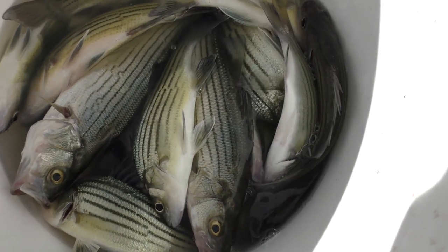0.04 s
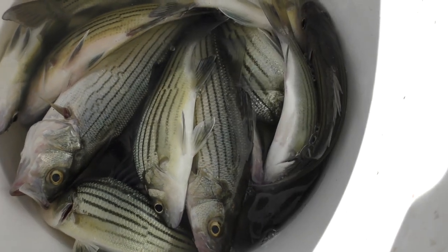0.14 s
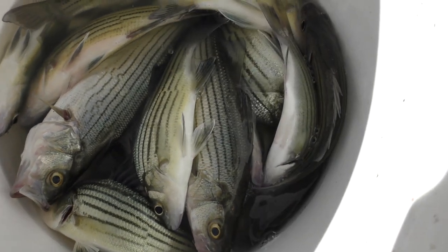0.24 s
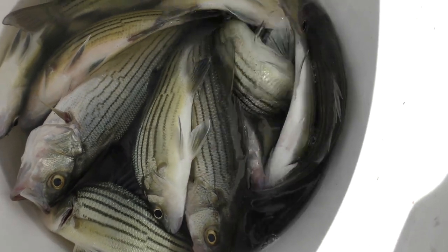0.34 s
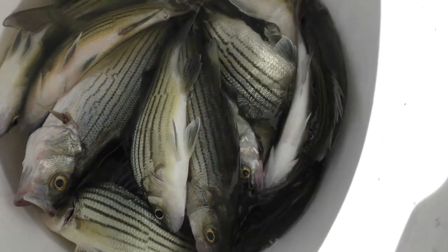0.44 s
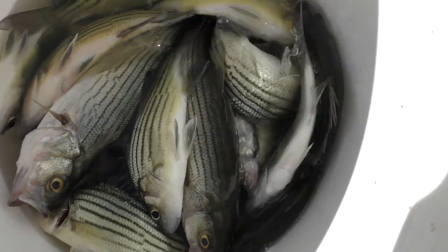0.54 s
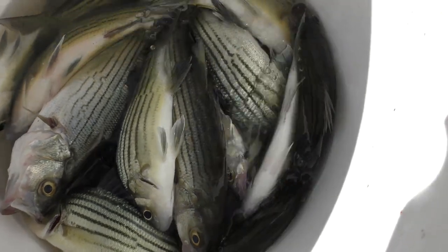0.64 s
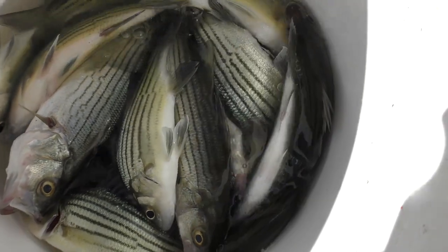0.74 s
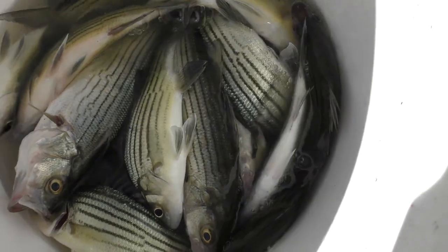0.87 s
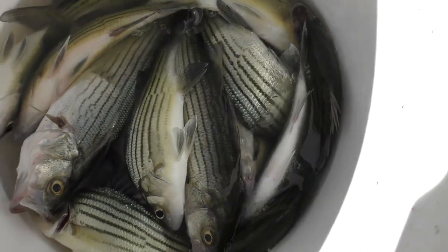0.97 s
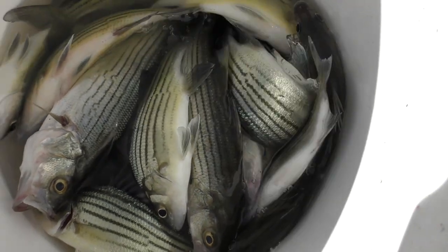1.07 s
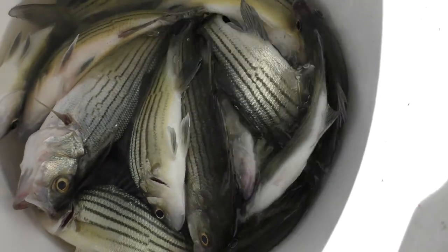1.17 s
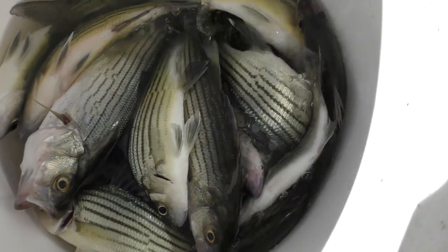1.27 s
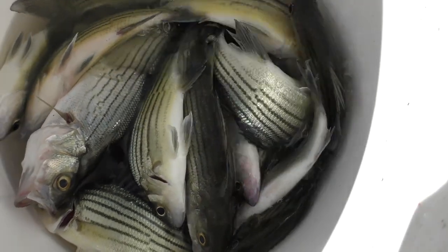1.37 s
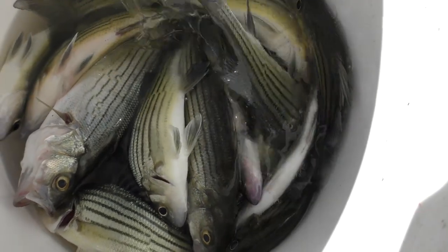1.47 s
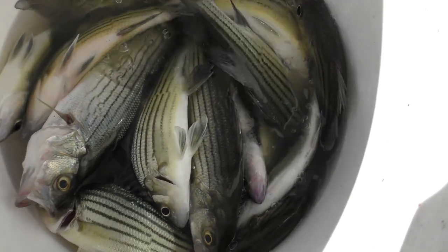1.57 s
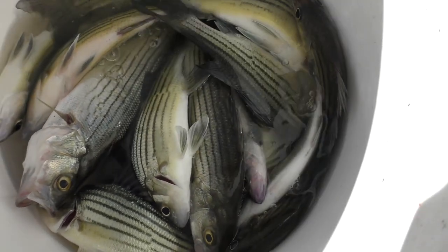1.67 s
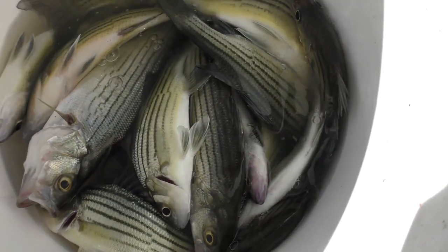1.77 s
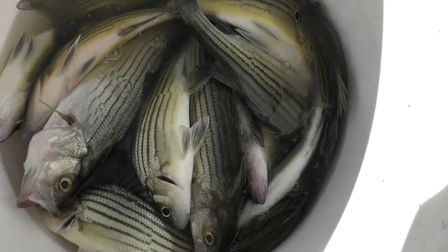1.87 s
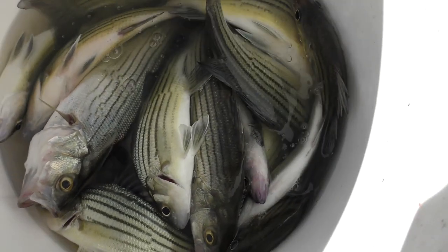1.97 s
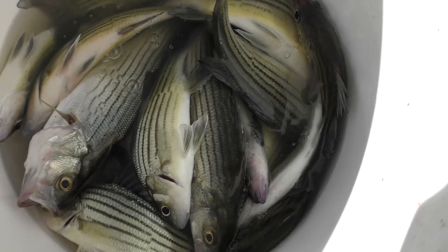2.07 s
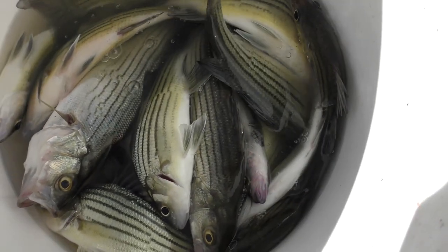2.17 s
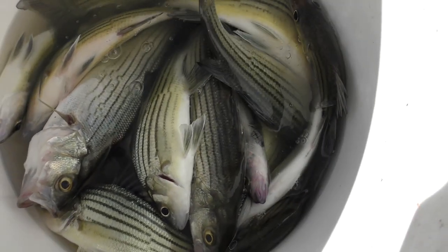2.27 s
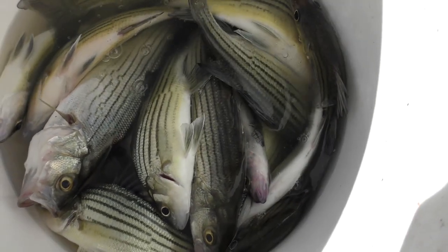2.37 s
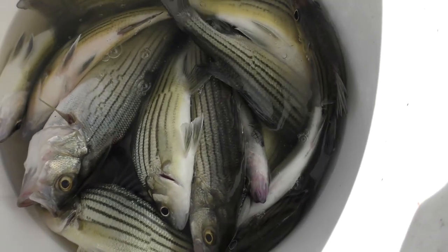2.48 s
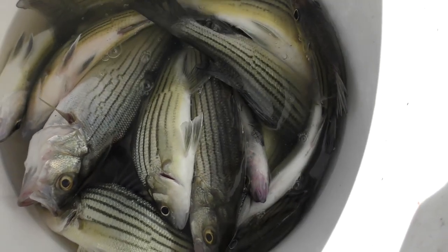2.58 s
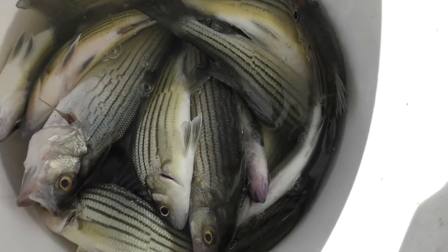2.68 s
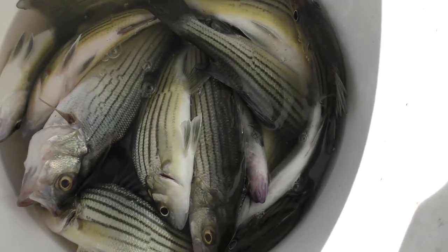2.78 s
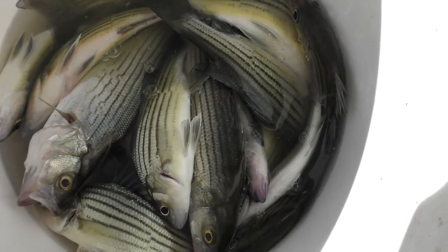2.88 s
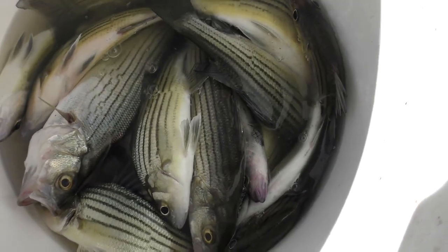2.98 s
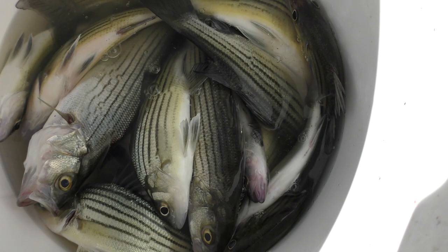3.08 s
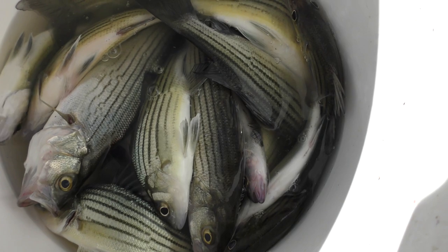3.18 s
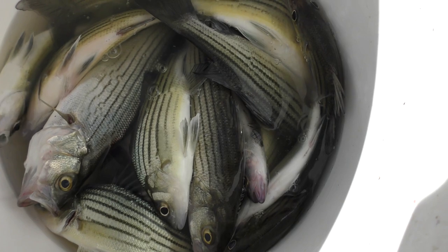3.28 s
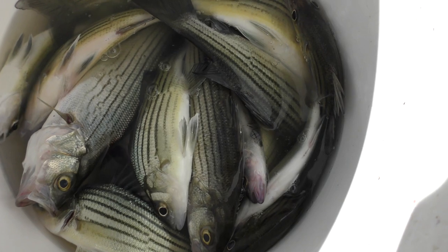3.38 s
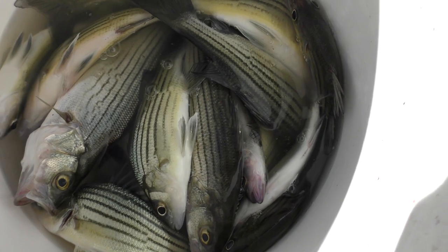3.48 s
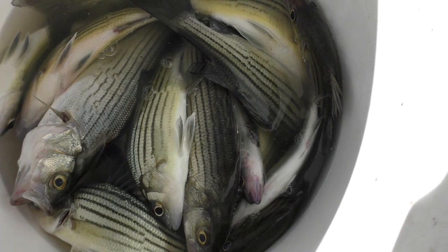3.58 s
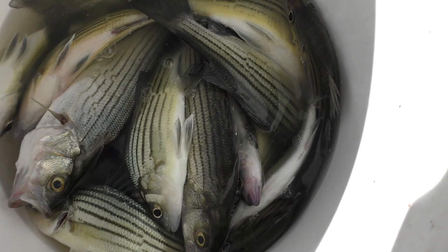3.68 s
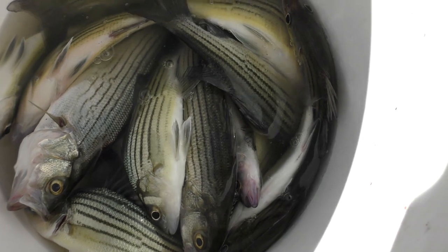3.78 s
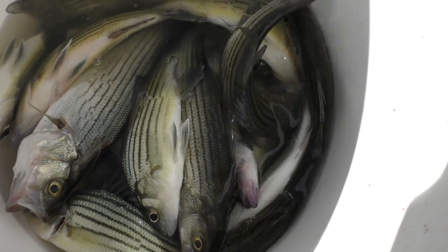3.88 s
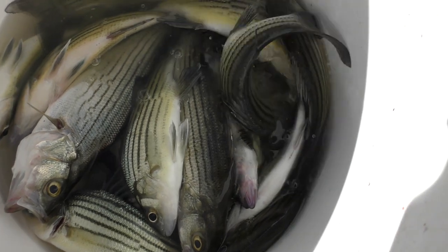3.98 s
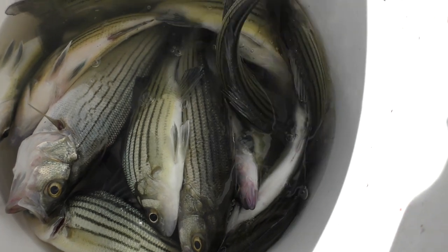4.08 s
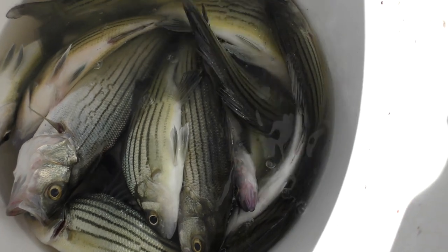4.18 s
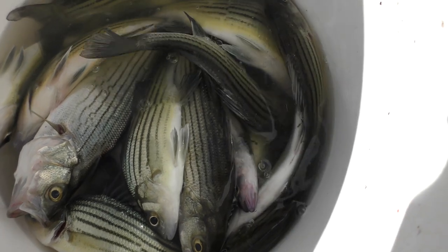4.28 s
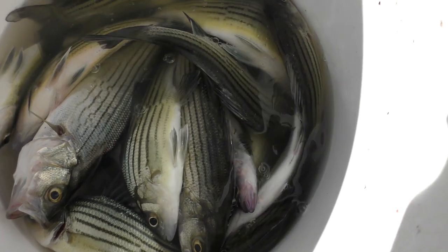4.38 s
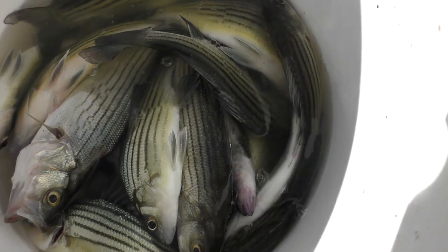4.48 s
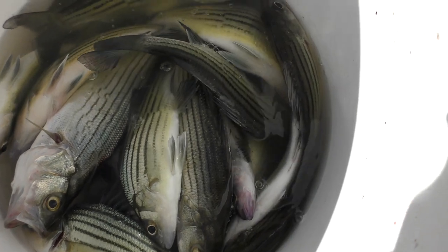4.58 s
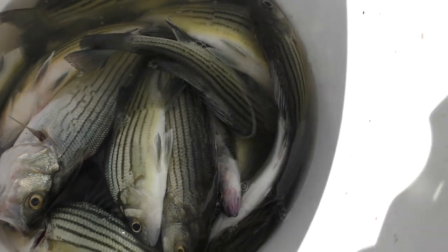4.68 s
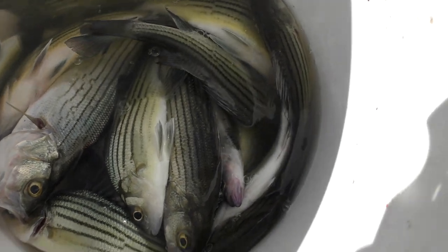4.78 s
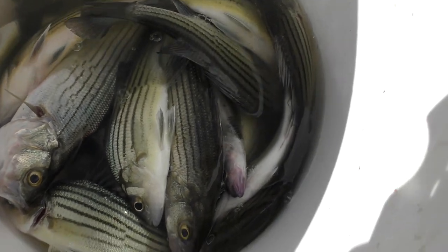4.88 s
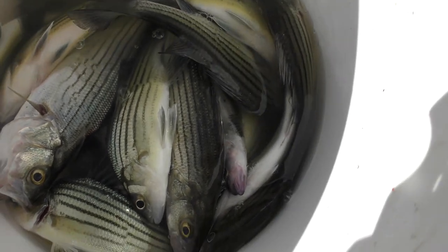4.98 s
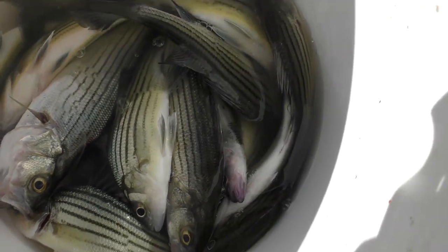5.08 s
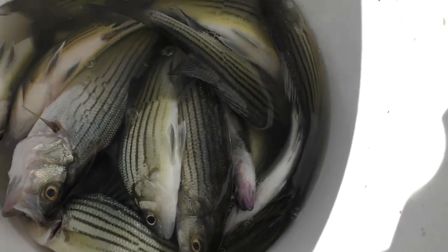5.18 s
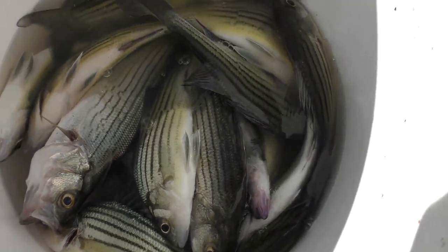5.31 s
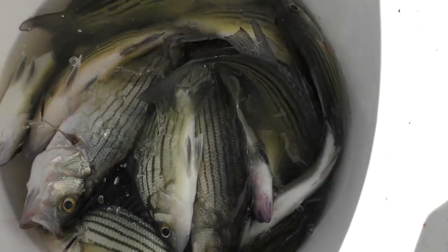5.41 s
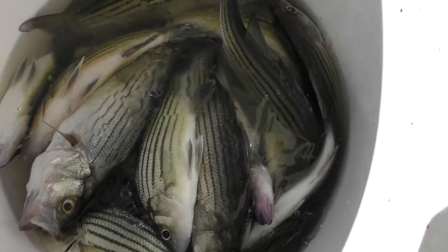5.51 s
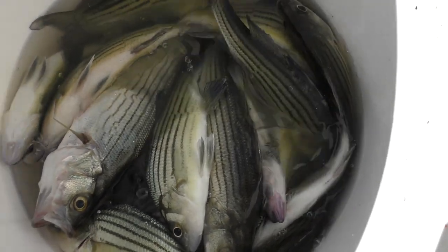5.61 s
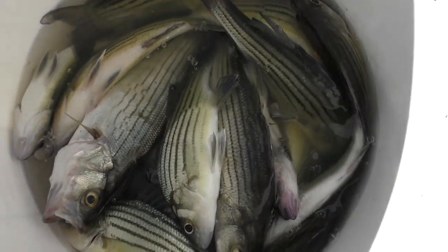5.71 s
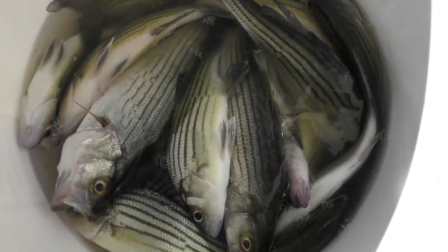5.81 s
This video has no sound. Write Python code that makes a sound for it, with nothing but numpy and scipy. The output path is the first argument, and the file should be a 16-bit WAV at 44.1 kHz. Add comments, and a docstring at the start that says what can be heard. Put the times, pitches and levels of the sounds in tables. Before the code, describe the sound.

Wet fish thrash in short bursts inside a bucket, slapping, gurgling and spraying, then lie nearly still above a faint machine drone.

```python
"""A distant machine hums low under soft open-air hiss, outdoors; then wet skin smacks in a plastic bucket.
Freshly caught fish flop there in a little water: tail sweeps churn it into bubbles and throw fizzing spray.
Larger air pockets ring, bodies thump the wall, scales swish past each other; the wet pile ticks throughout.
Hum, hiss, smacks and rubs are shaped noise and clicks; bubbles are decaying sines that rise in pitch.
The fish are heard through the close echoes and air modes of the bucket, in mid-side stereo."""
import sys
import numpy as np
from scipy import signal
from scipy.fft import rfft, irfft
from scipy.io import wavfile
from scipy.ndimage import uniform_filter1d

SR = 44100
rng = np.random.default_rng(int(sys.argv[2]) if len(sys.argv) > 2 else 0)


def pcm_store(signal):
    """Save signal as 16-bit PCM."""
    levels = np.round(np.clip(np.atleast_2d(signal), -1, 1) * 32767)
    wavfile.write(sys.argv[1], SR, levels.astype(np.int16).T)


N = 257984
TIME = np.arange(N) / SR


def from_db(db):
    """Decibels to gain."""
    return 10 ** (np.asarray(db) / 20)


def rms_one(x):
    """Scale to rms 1."""
    return x / np.sqrt(np.mean(x ** 2, axis=-1, keepdims=True) + 1e-20)


def add(track, s, sound):
    """Lay a short sound into a track at time s."""
    start = max(round(s * SR), 0)
    track[start:start + len(sound)] += sound[:N - start]


def band(x, low_hz, high_hz, order=2):
    """Band-pass filter."""
    edges = np.clip([low_hz, high_hz], 10, .47 * SR)
    return signal.sosfilt(signal.butter(order, edges, "band", fs=SR, output="sos"), x)


def resonate(x, hz, width_hz):
    """A resonance with gain 1 at its top."""
    r = np.exp(-np.pi * width_hz / SR)
    numerator = np.array([1, 0, -1]) * (1 - r * r) / 2
    denominator = [1, -2 * r * np.cos(2 * np.pi * hz / SR), r * r]
    return signal.lfilter(numerator, denominator, x + 1e-18)


def colour(x, spectrum):
    """Weight a steady sound by a spectrum, interpolated over log frequency; rms 1."""
    hz, db = np.transpose(spectrum)
    bins_hz = np.arange(N // 2 + 1) * SR / N
    gain = from_db(np.interp(np.log(bins_hz + 1), np.log(hz), db))
    return rms_one(irfft(rfft(x) * gain, N))


def stereo(mid, side, side_db):
    """Left and right from mid and side."""
    return mid + from_db(side_db) * np.array([side, -side])


def grains(per_s, spread_db):
    """Clicks at random times, of uneven size and sign."""
    sizes = from_db(spread_db * np.minimum(rng.exponential(1, N), 4))
    return (rng.random(N) < per_s / SR) * sizes * rng.choice([-1, 1], N)


def swell(s, rise, fall):
    """A stroke gathers speed, then dies away."""
    before, after = np.minimum(TIME - s, 0), np.maximum(TIME - s, 0)
    return np.exp(-(before / rise) ** 2 - after / fall)


def strokes(rows):
    """Low and high level of a row of strokes, summed in power."""
    power = 0
    for s, rise, fall, low_db, high_db in rows:
        power = power + (from_db([[low_db], [high_db]]) * swell(s, rise, fall)) ** 2
    return np.sqrt(power)


def chirp(hz, t60, rise, birth_s=0.00023, rise_limit_s=0.075):
    """Trapped air rings, rising in pitch as it nears the surface."""
    t = TIME[:int(np.clip(t60, .001, .2) * SR)]
    climb = rise_limit_s * np.tanh(t / rise_limit_s) * 100  # in units of 10 ms, levelling off
    pitch = np.minimum(hz * 2 ** (rise * climb), .45 * SR)
    phase = 2 * np.pi * np.cumsum(pitch) / SR
    return np.sin(phase) * np.exp(-np.log(1000) * t / t60) * (1 - np.exp(-t / birth_s))


def froth(per_s, low_hz, high_hz, cycles, rise, spread_db, clump_db=5, clump_s=0.0066, count=22):
    """Small bubbles of many sizes ring for some cycles; those of one size are born in clumps."""
    out, born = np.zeros(N), grains(per_s, spread_db)
    dealt = rng.integers(0, count, N)  # which size each bubble gets
    pitches = np.geomspace(low_hz, high_hz, count) * rng.uniform(.96, 1.04, count)
    for k, hz in enumerate(pitches):
        clumps = from_db(clump_db * np.clip(rng.standard_normal(N // 100), -2, 2))
        births = born * (dealt == k) * np.interp(TIME / clump_s, np.arange(len(clumps)), clumps)
        ring = chirp(hz, cycles / hz, rise * rng.uniform(0, 2))
        out += signal.oaconvolve(births, ring)[:N] * hz ** 1.5
    return out


# low resonances of the distant machine: [f/Hz, width/Hz, relative level/dB]
HUM_RESONANCES = [(100.5, 51.6, -12.5), (156, 39.3, -9), (207.8, 37.7, -3.5), (239.4, 25.7, -4),
                  (484.4, 86, -25)]
# the hum swells, then sinks unevenly: [t/s, gain/dB]
HUM_COURSE = [(0, -43), (.45, -39.5), (1.4, -40.5), (1.6, -45), (3.5, -43), (5.85, -45)]


def hum(side_db=-10):
    """A distant machine drones in a few low, wavering resonances: narrow bands of noise."""
    out = 0
    for hz, width, db in HUM_RESONANCES:
        noise = rng.standard_normal((2, N + SR))
        # the first second lets the filter settle
        mid, side = band(noise, hz - width / 2, hz + width / 2, order=3)[:, SR:]
        out = out + from_db(db) * stereo(rms_one(mid), rms_one(side), side_db)
    return out * from_db(np.interp(TIME, *np.transpose(HUM_COURSE)))


# spectrum of the outdoor hiss: [f/Hz, relative level/dB]
AIR_SPECTRUM = [(30, 6.5), (100, 21.5), (300, 12), (480, 1), (700, 3.5), (1100, 2), (2300, -0.5),
                (4000, -5.5), (7000, -16.5), (12000, -8.5), (16000, -17)]
# weighting of its side signal over frequency: [f/Hz, relative level/dB]
AIR_WIDTH = [(380, -13.5), (700, -16.5), (1300, -9.5), (4400, -9.5), (7000, -19), (15000, -17)]


def air(hiss_db=-53, rumble_db=-55.5, side_db=-7):
    """Soft outdoor hiss and a trace of rumble, both steady noise."""
    hz, db = np.transpose(AIR_SPECTRUM)
    side_spectrum = np.transpose([hz, db + np.interp(hz, *np.transpose(AIR_WIDTH))])
    mid = colour(rng.standard_normal(N), AIR_SPECTRUM)
    side = colour(rng.standard_normal(N), side_spectrum)
    rumble = rms_one(band(rng.standard_normal((2, N)), 48, 113))
    return from_db(hiss_db) * stereo(mid, side, side_db) + from_db(rumble_db) * rumble


def ticks(level_db=-67, per_s=24, spread_db=2.0, decay_s=0.0026, side_db=-12):
    """Films of slime snap here and there on the wet pile: faint, short crackles."""
    t = TIME[:SR // 50]
    snaps = grains(per_s, spread_db) ** 2
    power = np.abs(signal.oaconvolve(snaps, np.exp(-2 * t / decay_s))[:N])
    crackle = rms_one(band(np.sqrt(power) * rng.standard_normal((2, N)), 5300, 14200))
    return from_db(level_db) * stereo(*crackle, side_db)


# wet smacks: [t/s, relative snap level/dB, relative squelch level/dB, snap f/Hz, decay constant/s]
WET_SMACKS = [(0.024, -25.5, -55, 14600, 0.0028), (.405, -26.5, -33, 6600, 0.0017),
              (.4231, -15.5, -36, 13500, 0.0035), (0.4677, -16.5, -34, 7450, 0.0018),
              (.5942, -16, -30, 6630, 0.0073), (.6505, -18, -25, 11600, 0.0034),
              (0.6764, -25, -39, 9930, 0.0026), (0.694, -15.5, -46, 11200, 0.005),
              (1.0811, -5.5, -62, 11000, 0.0035), (1.1395, -19, -45, 5900, 0.0049),
              (1.1586, -19, -23.5, 6130, 0.0018), (1.2164, -25, -23, 5170, 0.0022),
              (1.2366, -24, -23, 5220, 0.0016), (1.2552, -11.5, -48, 6560, 0.0041),
              (1.3171, -4, -41, 6700, 0.0063), (1.3227, -1.5, -26.5, 11000, 0.0033),
              (1.357, -8.5, -29, 6100, 0.0054), (1.371, -33, -15.5, 5970, .0011),
              (1.4458, -15.5, -23.5, 5400, .002), (1.496, -28, -24.5, 13200, 0.0015),
              (1.5371, -14.5, -29, 14800, 0.0076), (1.6136, -17, -31, 9400, 0.003),
              (1.701, -35, -33, 9600, 0.0029), (2.2423, -24.5, -51, 11400, 0.0033),
              (3.0622, -32, -52, 7300, 0.0033), (3.2778, -28, -56, 9300, 0.0028),
              (3.5732, -26, -64, 7150, 0.0037), (3.6178, -30, -47.5, 12800, 0.009),
              (3.9681, -18, -27, 14200, 0.0048), (3.9858, -17, -24, 11800, 0.0047),
              (4.1816, -33, -57, 11800, 0.0029), (4.8206, -16, -34.5, 6900, 0.0034),
              (4.8812, -24, -40.5, 7260, 0.0058), (5.069, -2, -31.5, 10500, 0.0038),
              (5.173, -23.5, -44.5, 7300, 0.0027), (5.1863, -17.5, -41.5, 10400, 0.0037),
              (5.4507, 3, -28, 11700, 0.00063), (5.4532, -0.5, -47, 13200, 0.002),
              (5.534, -13.5, -33.5, 11500, 0.0044), (5.5777, -19, -34, 14040, 0.0035)]


def smacks(snap_db=5, squelch_db=18, broad_db=-7, snap_width_hz=2400, onset_s=0.00032, side_db=-13, uneven_db=4):
    """A film of water between skins tears in a quick, uneven run of tiny cracks."""
    out, t = np.zeros((2, N)), TIME[:SR // 25]
    for s, high_db, low_db, hz, decay in WET_SMACKS:
        unevenness = rms_one(uniform_filter1d(rng.standard_normal(len(t)), size=24))
        envelope = np.exp(-t / max(decay, 1e-4)) * (1 - np.exp(-t / onset_s))
        tear = rng.standard_normal((3, 2, len(t))) * from_db(uneven_db * unevenness) * envelope
        snap = rms_one(resonate(tear[0], hz, snap_width_hz))
        snap = snap + from_db(broad_db) * rms_one(band(tear[1], 9300, 13400))
        squelch = rms_one(band(tear[2], 1700, 3750))
        smack = from_db(high_db + snap_db) * snap + from_db(low_db + squelch_db) * squelch
        smack = smack / np.sqrt(len(t))  # levels set the energy of each smack
        for channel, sound in zip(out, stereo(*smack, side_db)):
            add(channel, s, sound)
    return out


# tail sweeps: [t/s at the height, rise/s, fall/s, relative churned water level/dB, relative spray level/dB]
TAIL_SWEEPS = [(.425, 0.016, 0.037, -36, -32.5), (.545, 0.12, 0.11, -38.5, -51),
               (.65, 0.019, .026, -33, -38.5), (.705, 0.027, 0.043, -35.5, -44),
               (1.16, 0.019, 0.029, -34.5, -35), (1.222, 0.01, .009, -44, -28),
               (1.248, 0.02, 0.0034, -20, -25), (1.282, 0.0073, 0.013, -30, -34),
               (1.324, 0.018, 0.035, -39, -35), (1.37, 0.0074, 0.017, -27.5, -27.5),
               (1.44, 0.037, 0.032, -30.5, -39.5), (1.495, 0.016, 0.0089, -29, -22.5),
               (1.545, 0.0092, 0.065, -42, -56), (1.616, 0.022, 0.0074, -54, -31.5),
               (1.716, 0.014, 0.006, -39.5, -31), (3.973, 0.038, 0.035, -33.5, -37.5),
               (4.035, 0.016, 0.068, -45, -54), (5.45, 0.0094, 0.0041, -24, -19),
               (5.53, 0.031, 0.04, -43, -41.5), (5.592, 0.013, 0.025, -39.5, -33.5)]
# spectral weighting of the churned water: [f/Hz, relative level/dB]
WATER_SPECTRUM = [(150, -39), (400, -40), (600, -5), (900, -7.5), (1400, 6.5), (2200, -6), (3500, -4),
                  (6000, -26), (12000, -27.5)]
# spectral weighting of the thrown spray: [f/Hz, relative level/dB]
SPRAY_SPECTRUM = [(1500, -20), (3000, -3), (5000, 0), (8000, -2), (11000, -1), (14000, -1), (16000, -4)]


def sweeps(churn_side_db=-6, spray_side_db=-11, wash_db=-6, mist_db=-9):
    """The tail churns gurgling bubbles and throws fine drops that fizz, over drops too small to ring."""
    water, spray = strokes(TAIL_SWEEPS)
    churn, fine_drops = [], []
    for _ in ("mid", "side"):
        gurgle = froth(per_s=2200, low_hz=450, high_hz=6000, cycles=32, rise=0.2, spread_db=3.5)
        gurgle = colour(gurgle, WATER_SPECTRUM)
        fizz = froth(per_s=3900, low_hz=2460, high_hz=14500, cycles=20, rise=0.19, spread_db=5.0)
        fizz = colour(fizz, SPRAY_SPECTRUM)
        splatter = grains(per_s=9000, spread_db=1.2)
        churn.append(rms_one(gurgle + from_db(wash_db) * colour(splatter, WATER_SPECTRUM)))
        fine_drops.append(rms_one(fizz + from_db(mist_db) * colour(splatter, SPRAY_SPECTRUM)))
    return water * stereo(*churn, churn_side_db) + spray * stereo(*fine_drops, spray_side_db)


def heaves(level_db=-13, low_hz=130, high_hz=320, side_db=-7):
    """With every sweep the weight of the fish rocks the bucket floor: a low boom of noise."""
    level = from_db(level_db) * strokes(TAIL_SWEEPS)[0]
    return level * stereo(*rms_one(band(rng.standard_normal((2, N)), low_hz, high_hz)), side_db)


def drops(per_s=340, level_db=-8, flight_s=0.015, firm_sweep_db=-24, side_db=-9, steepness=1.185):
    """Drops, thrown mostly by the harder sweeps, fall back and plink as small rising bubbles."""
    water = np.interp(TIME - flight_s, TIME, strokes(TAIL_SWEEPS)[0])
    firm = from_db(firm_sweep_db)  # the shower levels off towards this
    shower = firm * np.tanh((water / firm) ** steepness)
    plinks = [froth(per_s, low_hz=1104, high_hz=4890, cycles=35, rise=0.211, spread_db=2.5, clump_db=0.5)
              for _ in ("mid", "side")]
    plinks = rms_one(band(np.array(plinks), 1110, 2577))
    return from_db(level_db) * shower * stereo(*plinks, side_db)


# larger air pockets:
# [t/s, starting f/Hz, ring level/dB before the bucket, t60/s, initial rise/octaves per 10 ms]
LARGE_BUBBLES = [(.594, 2270, -5, 0.022, 0.025), (0.5953, 3160, -14, 0.0093, 0.1),
                 (.653, 2730, -13, 0.011, .02), (0.7, 1524, -22.5, 0.021, 0.16),
                 (0.976, 2500, -29, 0.0065, .05), (1.083, 4210, -17, 0.02, 0.079),
                 (1.162, 2430, -18.5, 0.056, 0.26), (1.163, 3570, -11, 0.016, 0.47),
                 (1.166, 6050, -14.5, 0.014, 0.16), (1.224, 4500, -26, 0.024, .02),
                 (1.25, 4340, -20.5, .028, .05), (1.323, 2220, -27, 0.072, .05),
                 (1.356, 2240, -20, 0.074, 0.048), (1.363, 3420, -10.5, 0.012, 0.27),
                 (1.373, 4260, -20, .026, 0.016), (1.438, 3270, -22.5, 0.052, 0.054),
                 (1.436, 1960, -23.5, 0.034, .25), (1.451, 1090, -30.5, 0.032, .05),
                 (1.4955, 1315, -12.5, 0.08, .19), (1.55, 2630, -17.5, 0.0095, 0.069),
                 (1.615, 3714, -12.5, 0.031, 0.011), (1.712, 2830, -27, 0.052, 0.0068),
                 (2.439, 3380, -31, 0.0067, .16), (2.499, 3400, -28, 0.0064, 0.23),
                 (2.845, 4060, -36, 0.012, 0.38), (3.409, 2460, -30, 0.023, 0.017),
                 (3.968, 1680, -16.5, 0.012, 0.39), (3.984, 1725, -18.5, 0.034, 0.174),
                 (4.047, 3220, -22.5, 0.022, 0.024), (4.173, 2230, -33.5, 0.02, .2),
                 (4.823, 3070, -36, 0.038, .03), (5.426, 8700, -13.5, 0.0078, 0.13),
                 (5.462, 3830, -22, 0.032, 0.088), (5.486, 4620, -28, 0.076, 0.032),
                 (5.534, 2620, -28.5, .03, 0.17), (5.577, 1510, -32.5, 0.043, .12)]


def bubbles(lag_s=.00002, pinch_db=-13, pinch_s=0.00082):
    """The larger air pockets pinch off with a tiny splash and plop, a little off centre."""
    out, t = np.zeros(N), TIME[:SR // 40]
    for s, hz, db, t60, rise in LARGE_BUBBLES:
        splash = rms_one(band(rng.standard_normal(len(t)), hz, 2 * hz, order=1))
        add(out, s, from_db(db + pinch_db) * splash * np.exp(-t / pinch_s))
        add(out, s, from_db(db) * chirp(hz, t60, rise))
    late = np.interp(TIME - lag_s, TIME, out)  # the right channel lags
    return np.array([out, late])


# bodies against the wall: [t/s, relative level/dB, f/Hz, t60/s]
WALL_THUMPS = [(.653, -19.5, 371, 0.041), (.718, -27, 434, .033), (1.236, -25.5, 746, 0.012),
               (1.3715, -14, 605, .021), (1.494, -31, 331, 0.013), (5.449, -20.5, 280, 0.023),
               (5.45, -17, 790, 0.0075)]


def thumps(flesh_db=-4):
    """The wall, damped by fish and water, gives a few cycles and a dull rush."""
    out, t = np.zeros(N), TIME[:SR // 10]
    for s, db, hz, t60 in WALL_THUMPS:
        flesh = rms_one(band(rng.standard_normal(len(t)), hz / 2, hz * np.sqrt(2)))
        knock = np.sin(2 * np.pi * hz * t) / 2 + from_db(flesh_db) * flesh
        add(out, s, from_db(db) * knock * np.exp(-np.log(1000) * t / t60))
    return out


# scales rubbing: [t/s at the height, rise/s, fall/s, relative body level/dB, relative hiss level/dB]
SCALE_RUBS = [(4.703, 0.0026, 0.0092, -31, -62), (4.735, 0.024, 0.023, -33.5, -47.5),
              (5.056, 0.026, 0.011, -36.5, -30.5), (5.425, 0.0081, 0.0083, -45.5, -38.5),
              (5.28, 0.24, 0.14, -59, -66), (5.67, 0.0055, 0.012, -66, -36),
              (5.77, 0.088, 0.87, -58.5, -44)]
# spectral weighting of the rub's body: [f/Hz, relative level/dB]
BODY_SPECTRUM = [(300, -3), (750, -12), (1250, 4), (2200, -2.5), (4000, -5.5), (8000, -7)]
# spectral weighting of the rub's hiss: [f/Hz, relative level/dB]
HISS_SPECTRUM = [(1500, -7.5), (4000, 4.5), (7000, -2.5), (12000, 9), (16000, -16)]


def rubs(side_db=-12):
    """Thousands of scale edges catch and let go, so densely that they merge into a swish."""
    body, hiss = strokes(SCALE_RUBS)
    swish = []
    for _ in ("mid", "side"):
        catches = grains(per_s=22000, spread_db=2)
        swish.append(body * colour(catches, BODY_SPECTRUM) + hiss * colour(catches, HISS_SPECTRUM))
    return stereo(*swish, side_db)


# air modes of the bucket: [f/Hz, level/dB, t60/s, side level/dB re the mode]
AIR_MODES = [(753, 6.5, 0.088, 7), (1040, 8.5, 0.07, -4), (1466, -5.5, 0.11, 9), (1754, -20.5, 0.042, -23),
             (2128, -6, 0.12, 11.5), (2650, -1, 0.084, -13)]
# close wall echoes: [left delay/s, right delay/s, level/dB re the direct sound]
WALL_ECHOES = [(.0014, .0009, -10.5), (.0022, 0.0012, -29), (.0046, .0047, -27)]


def bucket(x, scatter_db=-8, scatter_t60=0.036, linger_db=-22, linger_t60=0.07):
    """Close wall echoes, a brief scatter among the fish, and the ringing air column."""
    t = TIME[:SR // 4]
    direct = signal.unit_impulse(len(t))
    response = np.array([direct, direct])
    for hz, db, t60, side_db in AIR_MODES:
        mode = from_db(db) * resonate(direct, hz, np.log(1000) / np.pi / t60)
        response += stereo(mode, -mode, side_db)
    for left_s, right_s, db in WALL_ECHOES:
        response[[0, 1], [round(left_s * SR), round(right_s * SR)]] += from_db(db)
    for db, t60, top_hz in [(scatter_db, scatter_t60, 16000), (linger_db, linger_t60, 4000)]:
        tail = band(rng.standard_normal((2, len(t))), 600, top_hz, order=1)
        tail = tail * np.exp(-np.log(1000) * t / t60)
        response += from_db(db) * rms_one(stereo(*tail, side_db=-15)) / np.sqrt(len(t))
    return signal.fftconvolve(x, response, axes=1)[:, :N]


def scene():
    """The fish and water sound inside the bucket; its floor, the hum and the open air lie around them."""
    water = from_db(-6) * sweeps() + drops() + bubbles()
    fish = smacks() + thumps() + from_db(-3.5) * rubs() + ticks()
    return hum() + air() + bucket(water + fish) + heaves()


def record(dry, cutoff_hz=16600):
    """The loudest peaks are held within bounds, then the top of the treble is cut."""
    top_cut = signal.ellip(10, .1, 70, cutoff_hz, fs=SR, output="sos")
    return signal.sosfilt(top_cut, np.clip(dry, -.9, .9))


dry = scene()
out = record(dry)
pcm_store(out)
```